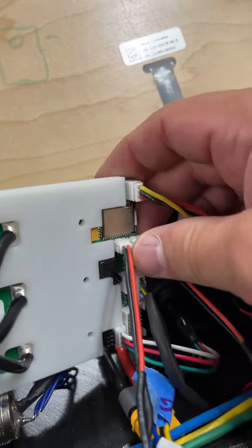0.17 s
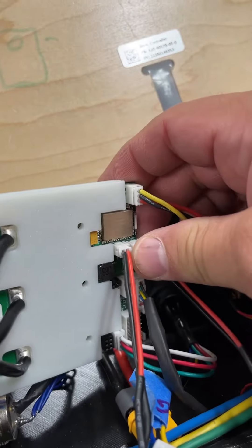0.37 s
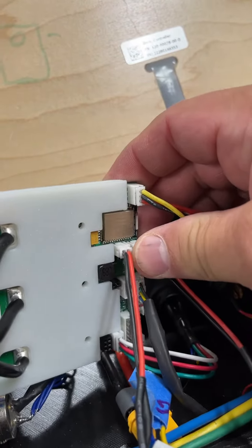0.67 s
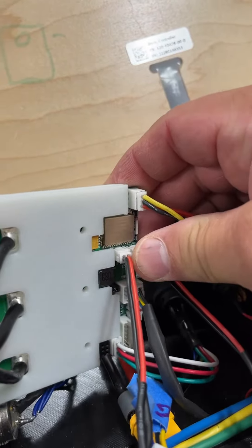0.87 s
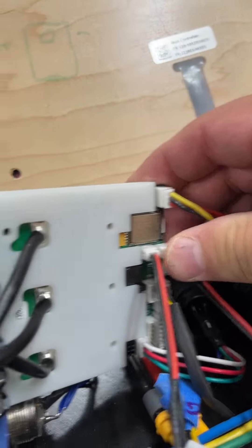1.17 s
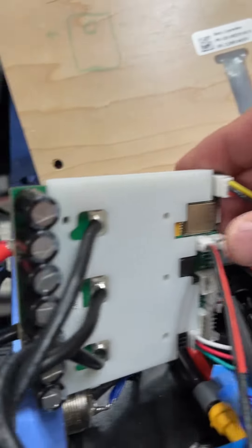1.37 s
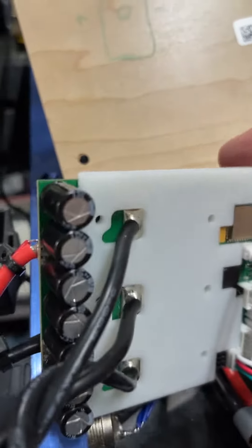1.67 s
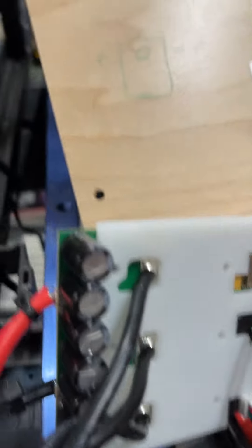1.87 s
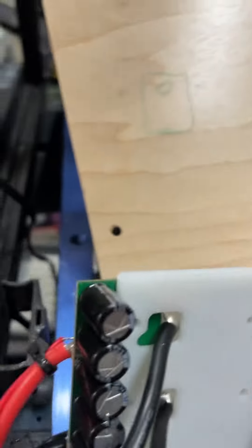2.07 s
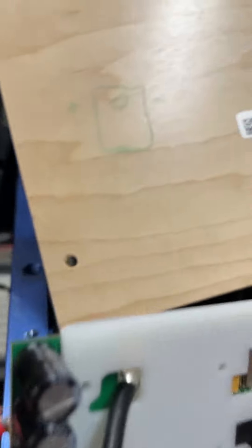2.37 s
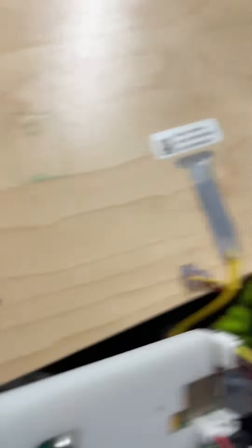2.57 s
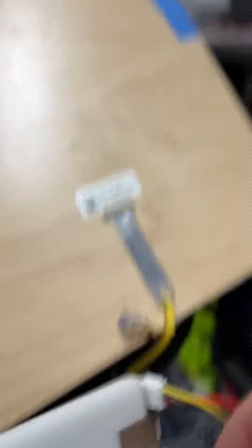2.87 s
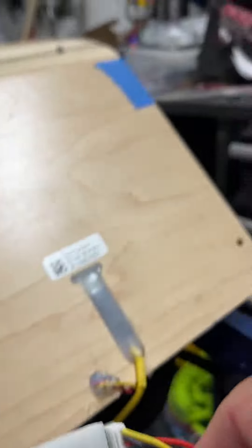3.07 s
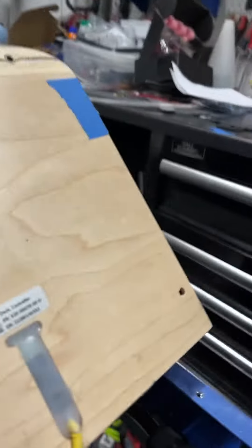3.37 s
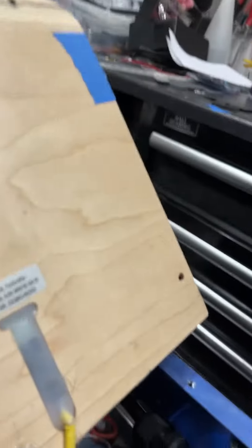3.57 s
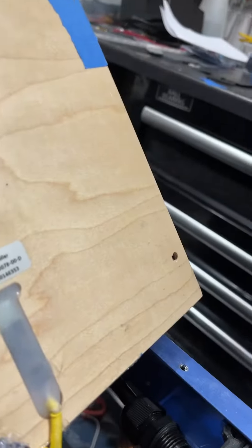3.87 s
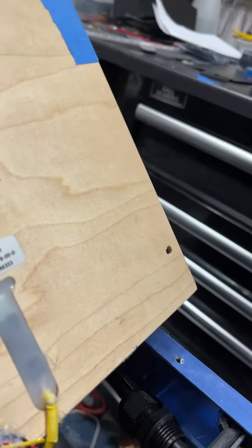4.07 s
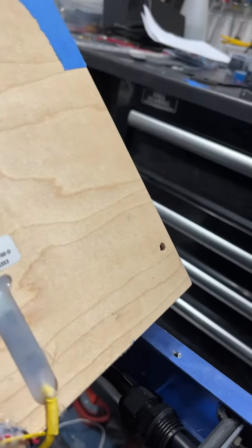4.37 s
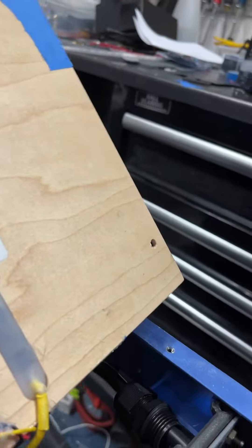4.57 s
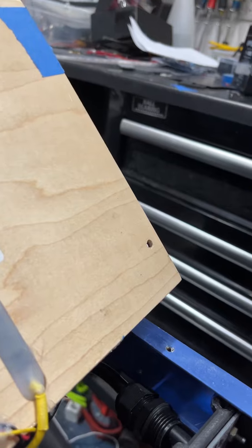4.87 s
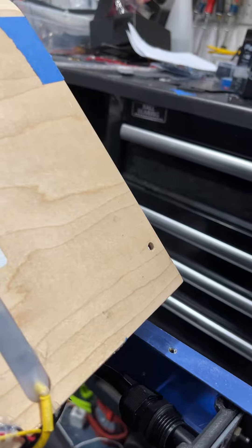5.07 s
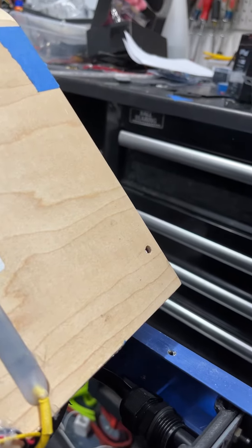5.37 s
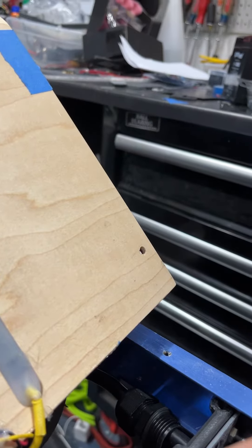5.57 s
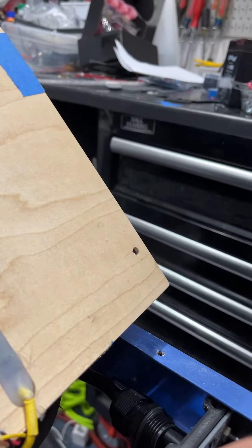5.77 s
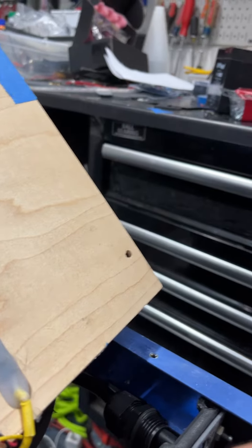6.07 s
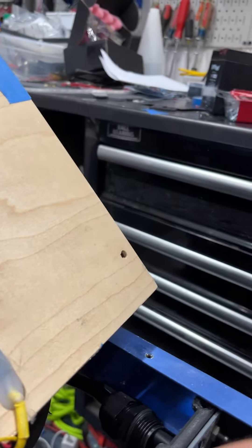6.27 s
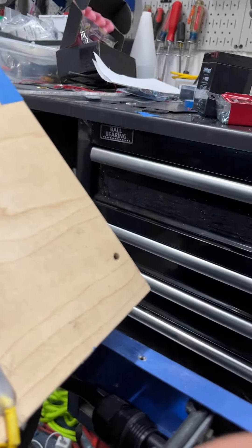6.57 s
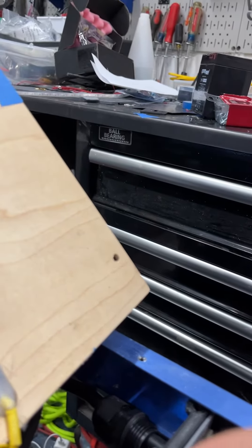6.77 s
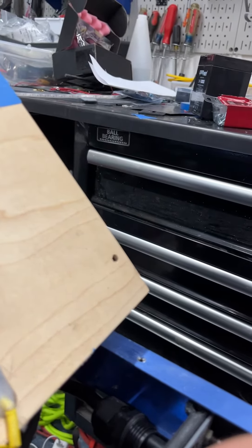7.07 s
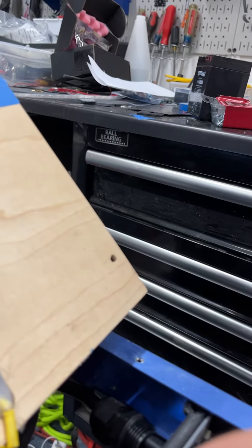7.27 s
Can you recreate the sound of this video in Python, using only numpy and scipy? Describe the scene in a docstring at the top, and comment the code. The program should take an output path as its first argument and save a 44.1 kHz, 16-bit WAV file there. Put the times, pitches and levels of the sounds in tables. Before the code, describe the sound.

Close, dry plastic ticks and brief wire scrapes, busiest near three seconds, then sparse clicks over a faint wavering mains hum and rumble.

```python
"""Mains hum, low machine rumble and faint room air run throughout: wavering sines over coloured noise.
Over them fingers work a small plastic connector and its wires on a circuit board, close to a hand-held phone.
Struck modes make the plastic tick, a contact spring ping and the plywood bench knock dully;
clumped noise makes wires and cables scrape, and one decaying low sine bumps the phone."""
import sys
import numpy as np
from scipy import signal
from scipy.fft import rfft, irfft, next_fast_len
from scipy.io import wavfile
from scipy.ndimage import map_coordinates

SR = 44100
rng = np.random.default_rng(int(sys.argv[2]) if len(sys.argv) > 2 else 0)


def how_loud(loudness_db):
    """Turn decibels into a plain amplitude multiplier (0 dB gives 1, 20 dB gives 10)."""
    steps = np.asarray(loudness_db, float) / 20
    return 10 ** steps


def put_to_file(sound):
    """Save the sound as 16-bit audio at rate SR, in the file named by the first command-line argument."""
    columns = np.atleast_2d(sound).T  # one column per channel
    safe = np.clip(columns, -1, 1)
    whole_steps = np.round(safe * 32767)
    wavfile.write(sys.argv[1], SR, whole_steps.astype(np.int16))


N = 327222  # length in samples

# Wavering level of the mains fundamental: start_s, level_db [s, dB rms]
HUM_LEVEL = [(0, -49), (.29, -67), (.43, -54.5), (.68, -53), (.83, -63), (.95, -51), (1.24, -74),
             (1.36, -55), (1.71, -55), (1.98, -62.5), (2.17, -68.5), (2.29, -57.5), (2.75, -50),
             (3.14, -59), (3.95, -64), (4.09, -54), (4.7, -57.5), (4.8, -73), (5.29, -54), (5.83, -54),
             (6.36, -63), (7.05, -51.5), (7.42, -67.5)]
# Mains fundamental and second harmonic: pitch_hz, pitch_hz [Hz]
MAINS_PITCHES = 60.54, 119.9
# Faint electronic whine: pitch_hz, centre level_db [Hz, dB rms]
WHINE_TONE = (8438, -107)
# Colour of the machine rumble: pitch_hz, level_db [Hz, relative dB per Hz]
RUMBLE_COLOUR = [(13, -55.5), (22, -22), (54, -1.5), (73, 1), (87, -1), (113, -11), (133, -6.5),
                 (146, -10.5), (250, -28), (320, -41), (550, -120)]
# Colour of the room air: pitch_hz, level_db [Hz, relative dB per Hz]
AIR_COLOUR = [(120, -11), (200, 0.5), (450, 1.5), (700, -1), (1000, -5.5), (1300, -12), (1700, -18.5),
              (2200, -24.5), (3500, -23), (5500, -28), (9000, -35.5), (14000, -42), (15000, -67.5)]
# Left-right likeness of the room air: pitch_hz, likeness [Hz, correlation]
AIR_LIKENESS = [(130, 0.82), (290, 0.64), (640, 0.04), (1400, 0.12), (3100, 0.54), (6000, 0.92),
                (15000, 0.3)]
# Decay of the shop's reverberation: pitch_hz, t60_s [Hz, s]
SHOP_DECAY = [(200, 0.18), (2000, 0.22), (10000, 0.11)]
# Jolts of the phone: start_s, strength_db, pitch_hz, t60_s [s, dB, Hz, s]
PHONE_BUMPS = [(2.626, -8, 54, 0.07)]
# Cables drag on the bench: peak_s, fade_s, level_db [s, s, dB]
CABLE_DRAGS = [(.569, .05, -59), (.68, 0.071, -56.5), (.81, 0.046, -51.5), (1.058, 0.078, -62),
               (1.167, 0.073, -56), (1.337, .08, -73.5), (1.517, .12, -54.5), (1.687, 0.18, -63.5),
               (1.916, .15, -68), (2.16, 0.16, -61), (2.405, 0.081, -52.5), (2.554, 0.17, -53.5),
               (2.85, 0.072, -40), (2.9, 0.079, -44.5), (3.02, .04, -50.5), (3.043, 0.067, -41),
               (3.12, 0.15, -59), (3.572, .15, -68), (3.79, 0.087, -70.5), (4.25, 0.061, -54.5),
               (4.5, 0.14, -69), (4.59, .05, -70), (4.659, 0.084, -57), (5.378, 0.08, -71.5),
               (5.498, .08, -60.5), (5.607, 0.11, -62), (5.77, .12, -65.5), (5.925, 0.12, -57),
               (6.24, .12, -64), (6.555, 0.067, -56.5), (6.778, .05, -54.5), (6.864, 0.057, -60),
               (7.063, 0.08, -69), (7.275, 0.039, -47), (7.315, 0.064, -51.5)]
# Fingers rub connector and wires: peak_s, fade_s, dull_db, bright_db, wire_hiss_db [s, s, dB, dB, dB]
FINGER_RUBS = [(.15, 0.066, -84, -94, -82), (.545, 0.03, -66.5, -90, -80.5), (.572, 0.026, -59, -75, -73.5),
               (.71, 0.15, -69.5, -67.5, -79), (.81, 0.064, -58, -64.5, -69.5),
               (1.045, 0.064, -83, -95, -74.5), (1.1, .07, -86, -97, -77.5), (1.17, 0.099, -74, -81, -80),
               (1.27, 0.18, -90, -97, -80), (1.46, 0.36, -76.5, -76.5, -79), (1.6, 0.22, -73.5, -81, -76.5),
               (1.687, 0.074, -67, -68, -70), (1.77, 0.36, -75.5, -92.5, -85.5),
               (1.916, 0.19, -76.5, -89.5, -90.5), (2.17, 0.066, -71, -90, -72),
               (2.22, 0.052, -72.5, -87, -75.5), (2.405, 0.098, -62.5, -82, -65),
               (2.54, .14, -61.5, -66.5, -64), (2.81, 0.12, -68, -69, -75),
               (2.862, 0.04, -38, -33.5, -40.5), (2.92, 0.19, -65.5, -66.5, -70),
               (3.04, 0.052, -55, -58, -90), (3.105, 0.13, -64.5, -62, -76), (3.34, 0.092, -96, -90.5, -85),
               (3.452, .1, -95, -87, -78), (3.68, .07, -83, -89.5, -87), (3.79, 0.088, -66.5, -73, -83),
               (4.1, .1, -97.5, -86, -82.5), (4.215, 0.037, -80, -67, -84), (4.255, .08, -75, -71, -86),
               (4.36, .1, -97, -78, -82.5), (4.43, 0.044, -89, -81, -82), (4.55, 0.056, -97.5, -99, -86),
               (4.59, .05, -70.5, -84, -82.5), (4.655, .07, -79, -72, -75), (4.969, 0.073, -82, -79, -90),
               (5.378, 0.076, -88, -88.5, -81), (5.498, .06, -77, -77, -72),
               (5.607, 0.064, -85.5, -80.5, -84.5), (5.78, 0.058, -69, -73, -78),
               (5.86, 0.14, -77, -76, -72), (5.917, 0.063, -64.5, -65.5, -70),
               (6.246, 0.027, -76, -70, -68.5), (6.495, 0.1, -94, -100, -70), (6.56, .06, -79, -93, -75.5),
               (6.778, 0.031, -59.5, -74, -76), (6.864, .06, -76.5, -87, -87),
               (7.063, 0.042, -73, -74, -77), (7.275, 0.034, -52.5, -58, -64), (7.32, 0.077, -73, -71, -80)]
# Steady levels of the layers between strokes: dull_db, bright_db, hiss_db, bench_db [dB]
RESTING_LEVELS = -96.5, -102, -97, -73
# Colours of the dull, then the bright plastic stroke: pitch_hz, level_db [Hz, relative dB per Hz]
RUB_COLOURS = [(1200, -25), (1900, -1.5), (2350, 3.5), (2800, -7.5), (3300, -1), (4200, -29)], [(2700, -22),
               (3600, 2), (5700, -8), (7000, -21.5)]
# Colour of the wire hiss: pitch_hz, level_db [Hz, relative dB per Hz]
WIRE_COLOUR = [(4500, -30), (6000, -2), (8000, -2.5), (9500, -5), (12000, -2), (14000, -10.5), (15800, -17),
               (16500, -47.5)]
# Colour of the friction that drives the bench: pitch_hz, level_db [Hz, relative dB per Hz]
DRAG_COLOUR = [(90, -23), (180, 5), (280, 1), (500, 1.5), (800, 0), (1200, -9.5), (1600, -8), (2300, -42)]
# Modes of the plywood bench: pitch_hz, level_db [Hz, relative dB]
BENCH_MODES = [(175, 0), (225, 1.5), (290, 2.5), (370, 0.5), (485, 2), (600, 0), (760, -2.5), (960, 2),
               (1190, 6.5), (1450, 3), (1700, 1)]
# Bench knocks: start_s, peak_db, strongest pitch_hz, t60_s, breadth_octaves [s, dB, Hz, s, octaves]
BENCH_KNOCKS = [(.566, -49.5, 312, .088, 0.37), (0.6694, -31, 570, 0.024, 0.95),
                (0.7863, -43.5, 271, 0.057, 0.54), (0.816, -46.5, 270, 0.064, 0.27),
                (1.007, -47, 496, 0.026, 0.71), (1.0317, -39.5, 545, 0.042, 0.68),
                (1.052, -42, 595, 0.027, 0.68), (1.0689, -44, 443, 0.06, 0.81),
                (1.0972, -41, 525, 0.025, 0.77), (1.135, -43.5, 486, 0.03, 0.7),
                (1.1765, -48.5, 393, 0.015, 0.56), (1.4556, -45.5, 443, .03, 0.77),
                (1.4983, -38.5, 527, 0.019, 0.93), (1.513, -38.5, 507, 0.018, 1),
                (1.5207, -40, 490, .035, 0.72), (1.534, -43.5, 518, 0.027, .83),
                (2.1492, -45, 444, 0.03, 0.51), (2.1696, -50, 280.6, 0.034, 0.85),
                (2.399, -40, 517, 0.028, 0.87), (2.4198, -38, 520, .029, 0.93),
                (2.5525, -57, 345, 0.019, 0.38), (2.6123, -40.5, 260, 0.0068, 0.78),
                (2.8198, -54.5, 506, .015, 0.87), (2.836, -37.5, 920, 0.067, 1),
                (2.853, -40, 640, 0.077, 1), (2.872, -30, 380, 0.0035, 1),
                (2.9978, -37.5, 505, 0.0081, .65), (3.0343, -21.5, 860, 0.018, 1),
                (3.0848, -41.5, 1150, 0.074, .61), (3.5412, -43, 447, 0.047, 0.89),
                (3.781, -51.5, 600, 0.079, 0.94), (4.205, -49.5, 453, 0.09, 1),
                (4.2455, -39.5, 1180, 0.028, 0.93), (4.4802, -48.5, 302, 0.077, 0.48),
                (4.494, -40.5, 583, 0.031, 0.8), (4.597, -47, 260, 0.026, 0.91),
                (4.655, -40, 400, 0.014, 0.87), (4.6668, -41.5, 590, 0.028, 0.85),
                (5.4649, -36, 504, .023, 0.8), (5.5725, -35.5, 527, 0.021, 0.84),
                (5.9268, -37, 774, .037, 0.32), (6.0173, -50, 305, 0.037, .8),
                (6.151, -41.5, 481, 0.048, 0.76), (6.4179, -40.5, 372, 0.03, 0.86),
                (6.5374, -34, 523, 0.019, 0.9), (6.5449, -48.5, 457, .021, .65),
                (6.7712, -51.5, 480, 0.085, .17), (6.788, -52.5, 474, 0.051, .16),
                (6.8421, -53, 481, 0.07, .12), (6.8757, -54, 474, .059, .2),
                (7.031, -52.5, 467, 0.059, 0.63), (7.0648, -57, 470, .063, .17),
                (7.269, -43, 500, .089, 0.3), (7.3096, -30, 490, 0.017, 0.91),
                (7.3167, -41, 590, 0.03, 0.48)]
# Left-right balance of the knocks: start_s, pan_db [s, dB left over right]
KNOCK_BALANCE = [(0, -2), (3.3, -5), (3.8, -0.5), (7.4, 1)]
# Modes of the contact spring: pitch_hz, level_db [Hz, relative dB]
SPRING_MODES = [(3090, -4), (3230, -18.5)]
# A contact spring let go: start_s, peak_db, t60_s [s, dB, s]
SPRING_PINGS = [(3.788, -45, 0.034), (4.424, -52.5, 0.051), (4.432, -58.5, 0.047), (4.654, -41, 0.02),
                (4.959, -54.5, 0.026), (6.790, -71.5, 0.024), (6.838, -70, 0.027), (7.067, -61, 0.025)]
# Modes of the connector shell: pitch_hz, level_db [Hz, relative dB]
SHELL_MODES = [(1950, -5.5), (2300, -11.5), (2650, -10), (3100, -5), (3680, 1), (4380, 6), (4940, 7),
               (5400, 2), (6200, 1.5), (7200, 3.5), (8450, -5), (9350, -4.5)]
# Plastic ticks: start_s, peak_db, strongest pitch_hz, t60_s, crack_db [s, dB, Hz, s, dB over ring before lift]
PLASTIC_TICKS = [(.567, -59, 2350, .008, -24), (0.5736, -57, 2060, .027, -22),
                 (.671, -21.5, 2170, 0.0076, 2), (0.7878, -51, 5200, 0.064, -7),
                 (0.816, -38.5, 4940, 0.022, -12), (.9, -72, 9060, .008, 1), (1.008, -71, 9100, 0.0056, -6),
                 (1.079, -62, 4100, 0.016, -5), (1.1581, -29, 8100, 0.011, -6.5),
                 (1.1916, -56.5, 4700, 0.028, -15), (1.287, -70, 5000, 0.011, 2),
                 (1.333, -37.5, 7060, 0.015, -8), (1.4485, -41.5, 8600, 0.03, -29),
                 (1.5198, -47.5, 4900, 0.016, 0.5), (1.5332, -55.5, 1860, 0.049, -10),
                 (1.9124, -55.5, 2300, 0.0045, -11), (2.144, -58, 2520, 0.031, -6),
                 (2.3881, -59, 2120, .073, -13), (2.3957, -45.5, 2160, 0.0094, -4.5),
                 (2.6111, -43, 1810, 0.003, -12), (2.7522, -48.5, 2100, .016, -40),
                 (2.803, -64.5, 2030, 0.0054, 15), (2.8543, -41.5, 2320, 0.038, 2),
                 (2.879, -40, 4100, 0.0067, 5), (3.0346, -22.5, 2210, 0.017, -23.5),
                 (3.0555, -45.5, 2190, 0.034, 6), (3.0837, -22.5, 4700, 0.036, -19),
                 (3.105, -27.5, 4540, 0.017, -20), (3.1133, -31.5, 4660, .0055, -24),
                 (3.7522, -55, 6500, 0.011, -8), (3.7822, -36, 6920, 0.011, 2),
                 (3.918, -63, 6640, .01, -14), (4.06, -55, 7000, .021, -8.5),
                 (4.2045, -43.5, 4500, 0.0085, 3), (4.2086, -34, 4350, 0.031, -11),
                 (4.2313, -54, 4060, 0.015, -10), (4.246, -36.5, 4030, 0.03, -12),
                 (4.4225, -58.5, 3080, 0.042, -4), (4.5888, -41, 5940, .011, -30),
                 (4.6072, -53, 4540, 0.01, -2), (4.6389, -33.5, 7000, .01, -26),
                 (4.6533, -27, 4340, 0.0054, -3.5), (4.96, -45, 3360, 0.0084, -5),
                 (5.2356, -54, 5550, .0038, -25), (5.4585, -53, 8700, 0.013, -9.5),
                 (5.491, -56, 4870, 0.0086, 8.5), (5.616, -57, 5100, 0.036, -15),
                 (5.7613, -56, 4830, 0.029, -18), (5.815, -45.5, 4960, 0.0056, -6),
                 (5.9259, -39.5, 2610, .015, -10), (6.2268, -56.5, 8900, 0.02, -3),
                 (6.362, -63.5, 6970, 0.0075, -11), (6.7661, -39, 5040, 0.012, -8.5),
                 (6.7832, -44, 5040, 0.0065, -19), (6.8023, -56.5, 2180, 0.011, -10),
                 (6.8557, -56.5, 2260, 0.013, -7.5), (7.049, -40.5, 2950, 0.0079, -8),
                 (7.0656, -39, 3130, 0.0074, 6), (7.2547, -49.5, 4250, 0.0079, -24),
                 (7.2667, -36.5, 4840, .006, -13), (7.273, -33, 4940, 0.0054, -16),
                 (7.2814, -31.5, 7120, 0.0042, -18), (7.288, -30.5, 5140, 0.027, -13.5)]
# Left-right balance of the ticks as the phone turns away: start_s, pan_db [s, dB left over right]
TICK_BALANCE = [(0, 2), (1.5, 4), (3.05, 1), (3.3, 0.5), (3.8, -0.5), (7.4, 0.5)]
# Colour of a tick's crack: pitch_hz, level_db [Hz, relative dB per Hz]
CRACK_COLOUR = [(800, -24), (2000, 2.5), (5000, 6), (10000, -4), (14000, -10), (16000, -20), (17000, -50.5)]
# The phone body's shading of the near sounds: pitch_hz, shade_db [Hz, dB left over right]
BODY_SHADE = [(60, -6), (130, -8), (290, -1), (640, -1.5), (1410, 1.5), (3100, -1.5), (6820, -2),
              (15000, 0.5)]
# Level of the near sounds' top treble: start_s, level_db [s, dB]
TREBLE_LEVEL = [(0, 1.5), (.67, 5), (1.2, 3.5), (1.7, 3), (2.8, -1.5), (3.35, 3.5), (3.45, -11.5),
                (3.8, -5.5), (4.1, 4), (4.65, -1), (5.401, 3), (5.849, 1.5), (6.3, -2), (6.49, 4),
                (6.6, -3), (7.42, -2)]
# Fixed phase difference of the recorder's stereo widening: pitch_hz, phase_rad [Hz, radians left over right]
WIDENING_PHASE = [(0, 0), (600, -.85), (1500, 0), (2150, 1), (3200, 2.5), (5000, 1.4), (7490, 5.8),
                  (10900, 9.9), (13500, 13.8), (16400, 18)]

OCTAVE_DB, OCTAVE_WAVER_DB = -58.5, 3.1  # second mains harmonic
BUMP_LAG_S = 0.001  # the jolt reaches the left side later
FADE_DB, RISE_SHARE = 24, 0.71  # a stroke falls this far in its fade time; its rise takes this share of it
STROKE_ROUND = 1.16  # above 1 a stroke holds near its peak before it fades
SLIP_DB = 2.6  # depth of the slow stick-slip clumps on plastic and wires
PLASTIC_DAMPING = 0.06  # width over frequency of the rubbed shell's modes
PAN_SCATTER_DB = 1.2
FAINT_DB, FAINT_SPREAD_DB, FAINT_T60_S = -66, 6.5, 0.0089  # faint ticks at random moments
CRACK_FLOOR = 0.45  # a crack has no body below this share of the struck region's pitch
CRACK_LIFT_DB = 4.5  # added to every crack
TOP_HZ = 10500  # where the top treble begins


def unit(x):
    """Scale to rms 1."""
    return x / np.sqrt(np.mean(x ** 2) + 1e-20)


def along(points, hz):
    """Read a curve of (Hz, value) points on a log frequency axis."""
    f, v = np.transpose(points)
    return np.interp(np.log(hz + 1), np.log(f + 1), v)


def over_time(points, s):
    """Read a curve of (s, value) points."""
    return np.interp(s, *np.transpose(points))


def wobble(rate):
    """A smooth random curve with rate knots a second."""
    knots = rng.standard_normal(int(N * rate / SR) + 4)
    return map_coordinates(knots, [np.arange(N) * rate / SR])


def filtered(x, response):
    """Shape x by a complex response of frequency."""
    m = next_fast_len(N + 8192)
    return irfft(rfft(x, m) * response(np.fft.rfftfreq(m, 1 / SR)), m)[..., :N]


def through(x, modes, damping):
    """Pass x through an object's resonances, a sum of band-pass modes of alternating sign."""
    def response(f):
        total = 0
        for k, (centre, db) in enumerate(modes):
            loss = 1j * f * damping * centre
            total = total + (-1) ** k * how_loud(db) * loss / (centre * centre - f * f + loss)
        return total
    return filtered(x, response)


def noise(spectrum, alike):
    """Stereo noise of rms 1 with a given colour and left-right likeness, built from mid and side."""
    def colour(hz):
        turn = np.arccos(np.clip(along(alike, hz), -1, 1)) / 2
        return how_loud(along(spectrum, hz)) * [np.cos(turn), np.sin(turn)]
    mid, side = filtered(rng.standard_normal((2, N)), colour)
    return unit(np.array([mid + side, mid - side]))


def add(track, s, sound, pan_db):
    """Mix one sound in at time s, panned."""
    start = round(s * SR)
    track[:, start:start + len(sound)] += how_loud([[pan_db / 2], [-pan_db / 2]]) * sound


def pan(points, s):
    """Left-right dB of a blow at time s, with random scatter."""
    return over_time(points, s) + PAN_SCATTER_DB * rng.standard_normal()


def ring(modes, centre_hz, octaves, t60, t, late, soft):
    """A blow rings the modes near where it lands, those longest; low modes arrive later, as bending waves do."""
    hz, db = np.transpose(modes)[:, :, None]
    draw = rng.standard_normal((len(hz), 3))
    off = (np.log2(hz / centre_hz) / octaves) ** 2
    db = db - 6 * off + 2.1 * draw[:, :1]
    delay = late * (np.sqrt(300 / hz) - np.sqrt(300 / hz.max()))
    age = np.maximum(t - delay, 0)
    life = t60 * (centre_hz / hz) ** 0.24 / (1 + 0.22 * off)
    swell = 1 - np.exp(-age * hz / soft)
    blow = how_loud(db - 60 * age / life)
    after_ring = how_loud(db - 18.5 - 22 * age / life)  # weaker and slower to fade
    detuned_hz = hz * (1 + 0.027 * draw[:, 1:2])
    tones = np.sin(2 * np.pi * detuned_hz * age + 2 * draw[:, 2:])
    sound = np.sum((blow + after_ring) * swell * tones, 0)
    return sound / np.abs(sound).max()


def strokes(rows, resting_db):
    """Gain of each friction layer: stroke powers swell, fade and add to the resting level."""
    t = np.arange(N) / SR
    power = how_loud(np.reshape(resting_db, (-1, 1))) ** 2
    for s, fade, *db in rows:
        away = np.maximum((t - s) / fade, (s - t) / (RISE_SHARE * fade))
        shape = how_loud(-2 * FADE_DB * away ** STROKE_ROUND)
        power = power + how_loud(np.reshape(db, (-1, 1))) ** 2 * shape
    return np.sqrt(power)


def workshop():
    """Wavering mains lines and a faint whine lie over noise-made rumble and room air."""
    t = np.arange(N) / SR

    def line(hz, db, drift):
        return np.sqrt(2) * how_loud(db) * np.sin(2 * np.pi * hz * t + drift * wobble(5))

    fundamental = line(MAINS_PITCHES[0], over_time(HUM_LEVEL, t), drift=0.4)
    octave = line(MAINS_PITCHES[1], OCTAVE_DB + OCTAVE_WAVER_DB * wobble(6), drift=0.12)
    whine = line(WHINE_TONE[0], WHINE_TONE[1] + 5 * wobble(2), drift=0.4)
    rumble = how_loud(-59.5) * noise(RUMBLE_COLOUR, [(60, 0.93), (250, 0.8)])
    air = how_loud(-69.5 + 0.8 * wobble(3)) * noise(AIR_COLOUR, AIR_LIKENESS)
    return fundamental + octave + whine + rumble + air


def walls(x):
    """The room answers with a noise tail in which each frequency dies at its own speed."""
    hz, t, z = signal.stft(rng.standard_normal((2, SR // 2)), SR, nperseg=256)
    decay = how_loud(-60 * t / along(SHOP_DECAY, hz)[:, None])
    tail = signal.istft(z * decay, SR, nperseg=256)[1]
    delayed = np.pad(x, ((0, 0), (90, 0)))  # samples
    return signal.fftconvolve(delayed, tail / np.linalg.norm(tail[0]), axes=1)[:, :N]


def bump():
    """The hand jolts the phone: a few slow, decaying cycles, nearly alike on both sides."""
    out = np.zeros((2, N))
    lag = BUMP_LAG_S * np.array([[0.5], [-0.5]])
    for s, db, hz, t60 in PHONE_BUMPS:
        age = np.maximum(np.arange(N) / SR - s - lag, 0)
        swell = 1 - np.exp(-age * hz)
        out += how_loud(db - 60 * age / t60) * swell * np.sin(2 * np.pi * hz * age)
    return out


def scrape():
    """Stick-slip friction: noise in short clumps, hissing on wires and exciting plastic and bench modes."""
    slip = wobble(120)
    plastic = []
    for colour in RUB_COLOURS:
        grains = noise(colour, [(1000, 0.94)]) * how_loud(SLIP_DB * slip + 0.8 * wobble(500))
        plastic.append(unit(through(grains, SHELL_MODES, PLASTIC_DAMPING)))
    dull, bright = plastic
    hiss = unit(noise(WIRE_COLOUR, [(1000, 1.0)]) * how_loud(SLIP_DB * slip + 1.5 * wobble(500)))
    drag = noise(DRAG_COLOUR, [(300, 0.65), (1200, 0.24)]) * how_loud(1.9 * slip + 1.9 * wobble(50))
    bench = unit(through(drag, BENCH_MODES, damping=0.21))
    rub = strokes(FINGER_RUBS, RESTING_LEVELS[:3])
    drag_gain = strokes(CABLE_DRAGS, RESTING_LEVELS[3])
    return rub[0] * dull + rub[1] * bright + rub[2] * hiss + drag_gain * bench


def knocks():
    """The board and its cables tap the plywood, ringing its low modes."""
    bench, t = np.zeros((2, N + SR)), np.arange(SR // 8) / SR
    for s, db, hz, t60, octaves in BENCH_KNOCKS:
        sound = ring(BENCH_MODES, hz, max(octaves, 0.1), t60, t, late=0.004, soft=0.59)
        add(bench, s, how_loud(db) * sound, pan(KNOCK_BALANCE, s))
    return bench[:, :N]


def pings():
    """A small metal spring in the connector sings after some ticks, as decaying sines."""
    spring, t = np.zeros((2, N + SR)), np.arange(SR // 8) / SR
    for s, db, t60 in SPRING_PINGS:
        sound = sum(how_loud(db + level - 60 * t / t60) * np.sin(2 * np.pi * hz * t) for hz, level in SPRING_MODES)
        add(spring, s, sound, pan_db=-12.5)
    return spring[:, :N]


def faint(count):
    """Rows of small ticks, scattered at random in time, level and pitch."""
    rows = []
    for when, size, place in rng.random((count, 3)):
        db = FAINT_DB + FAINT_SPREAD_DB * (2 * size - 1)
        rows.append((when * N / SR, db, 1900 * 2.74 ** place, FAINT_T60_S, -10))
    return rows


def ticks():
    """The connector shell rings briefly under a broadband crack of decaying noise."""
    shell, cracks = np.zeros((2, N + SR)), np.zeros((2, N + SR))
    t = np.arange(SR // 10) / SR
    for s, db, hz, t60, crack_db in PLASTIC_TICKS + faint(count=10):
        side = pan(TICK_BALANCE, s)
        sound = ring(SHELL_MODES, hz, 0.47, t60, t, late=0.0005, soft=0.27)
        add(shell, s, how_loud(db) * sound, side)
        envelope = (1 - np.exp(-t / 0.00054)) * how_loud(-60 * t / (1.16 * t60))
        burst = envelope * rng.standard_normal(len(t))
        burst = signal.lfilter(*signal.butter(2, CRACK_FLOOR * hz, "high", fs=SR), burst)
        add(cracks, s, how_loud(db + crack_db + CRACK_LIFT_DB) * burst, side)
    return shell[:, :N] + filtered(cracks[:, :N], lambda hz: how_loud(along(CRACK_COLOUR, hz)))


def scene():
    """Near handling, shaded by the phone's body and with moving top treble, in the shop."""
    background = workshop()
    hits = knocks() + pings() + ticks()
    sides = np.array([[1], [-1]])
    near = filtered(hits + scrape(), lambda hz: how_loud(along(BODY_SHADE, hz) / 2 * sides))
    top = filtered(near, lambda hz: hz > TOP_HZ)
    top_gain = how_loud(over_time(TREBLE_LEVEL, np.arange(N) / SR))
    near = near + (top_gain - 1) * top
    return background + how_loud(-27.0) * walls(hits) + bump() + near


def band_limit(x):
    """A steep low-pass at the top of the band."""
    return signal.sosfilt(signal.butter(12, 16800, fs=SR, output="sos"), x)


def record(dry):
    """The recorder's stereo widening: a fixed phase difference, left over right, half of it on each side."""
    f, phase = np.transpose(WIDENING_PHASE)
    sides = np.array([[1], [-1]])
    mix = filtered(dry, lambda hz: np.exp(0.5j * np.interp(hz, f, phase) * sides))
    return band_limit(mix)


dry = scene()
out = record(dry)
put_to_file(out)
```